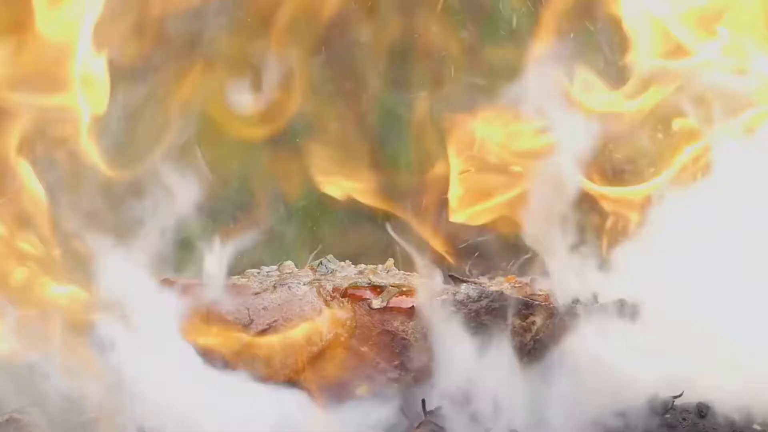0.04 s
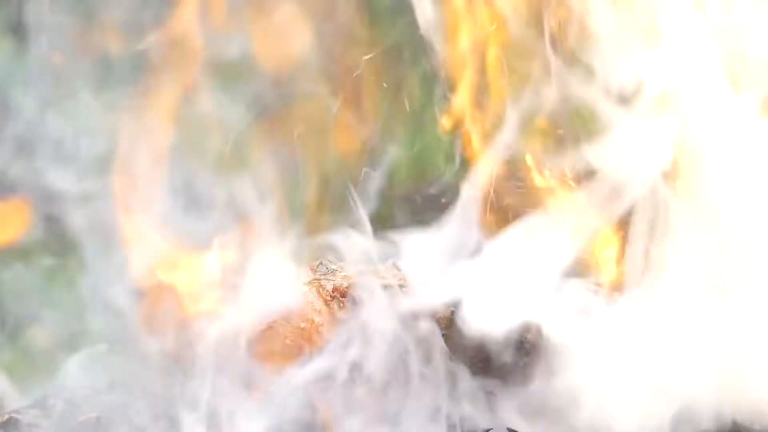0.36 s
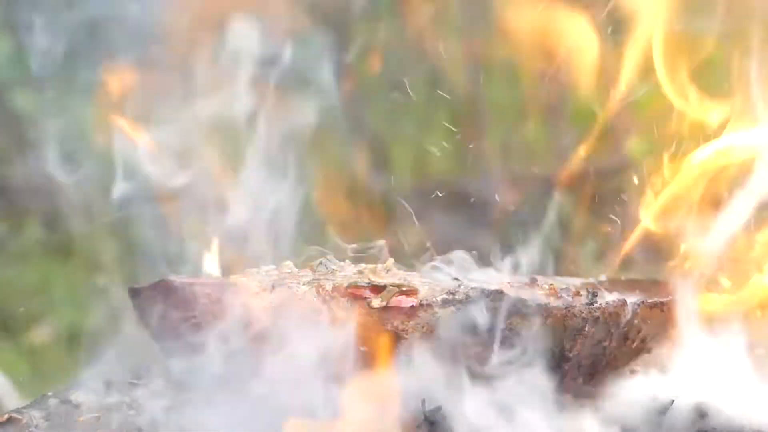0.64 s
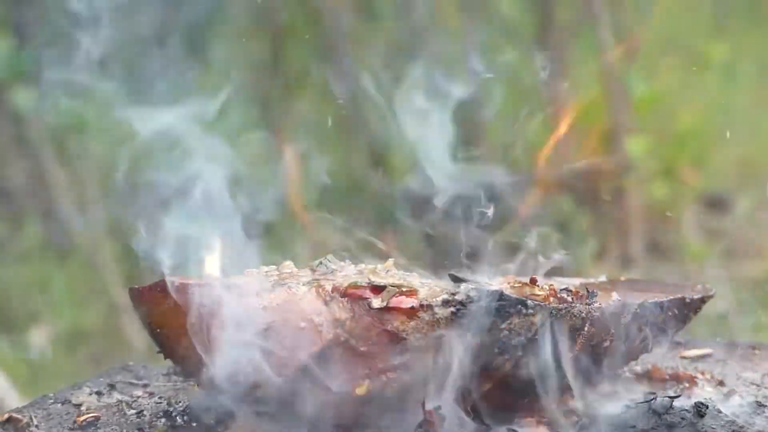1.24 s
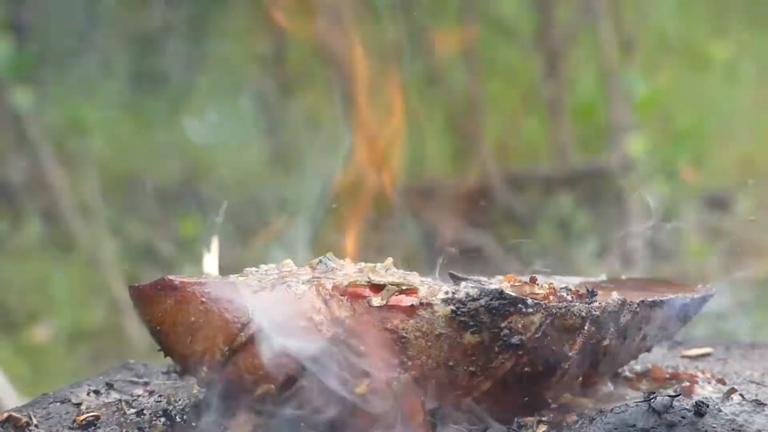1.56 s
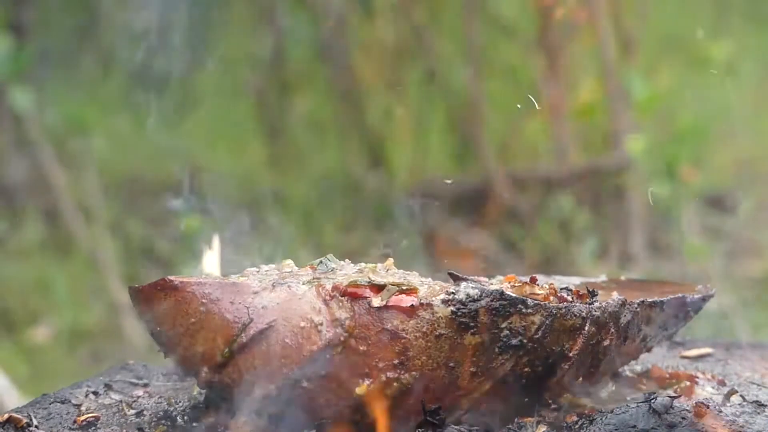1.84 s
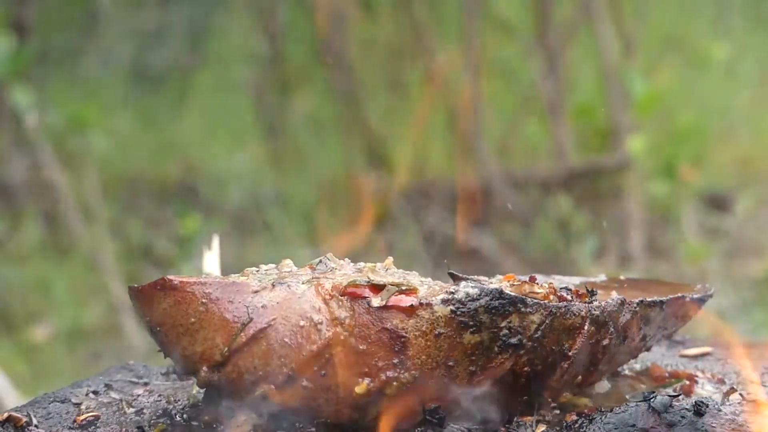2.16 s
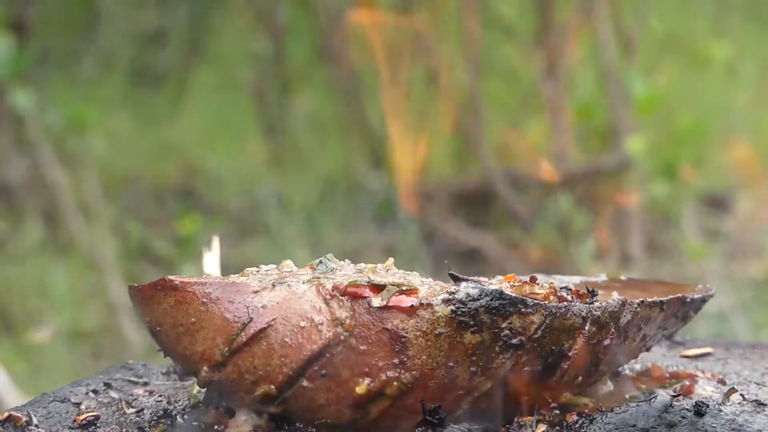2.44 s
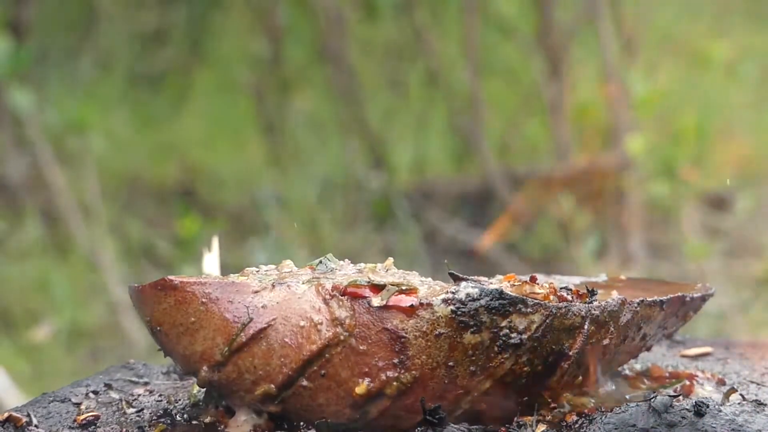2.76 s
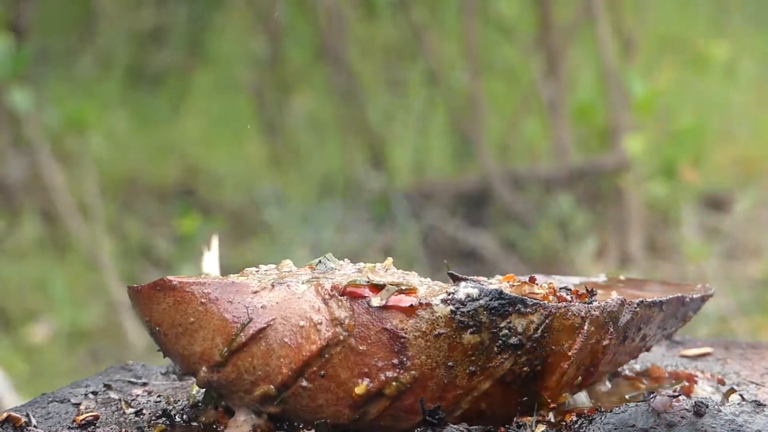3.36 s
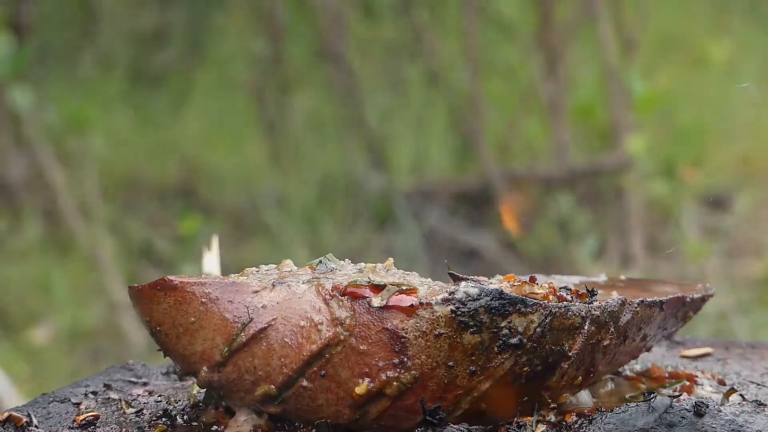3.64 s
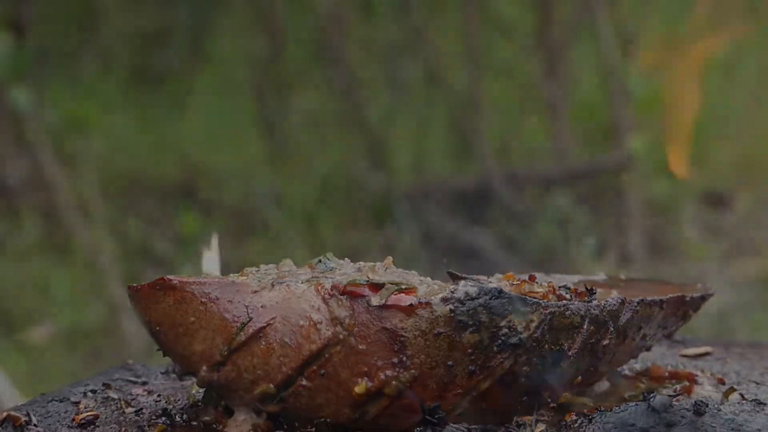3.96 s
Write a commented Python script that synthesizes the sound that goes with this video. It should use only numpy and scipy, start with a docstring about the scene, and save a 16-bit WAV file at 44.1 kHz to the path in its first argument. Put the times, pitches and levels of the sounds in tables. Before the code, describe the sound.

Close sizzling of food on a hot stone in the open air starts as a strong, bright hiss. Sharp pops join as it dies down to a lighter crackle, over a soft low flutter of flames.

```python
"""Food sizzling on a hot rock over an open fire, outdoors, close by.
0-0.8 s: the flames flare; countless tiny bursts of fat and water merge into a hiss.
From 0.7 s: single sharp pops, each a crack plus the ring of a bubble's cavity.
0.8-4 s: the flames die down; the hiss fades and thins into clumps of crackle.
Throughout: rock and ground reflect each burst within milliseconds; the fire rumbles softly below."""
import sys
import numpy as np
from scipy import signal
from scipy.fft import rfft, irfft, next_fast_len
from scipy.io import wavfile
from scipy.ndimage import map_coordinates

SR = 44100
rng = np.random.default_rng(int(sys.argv[2]) if len(sys.argv) > 2 else 0)


def pcm_store(signal):
    """Save signal as 16-bit PCM."""
    levels = np.round(np.clip(np.atleast_2d(signal), -1, 1) * 32767)
    wavfile.write(sys.argv[1], SR, levels.astype(np.int16).T)


N = 176400

# Sizzle envelope per band: t/s, low level/dB, mid level/dB, treble level/dB
SIZZLE_LEVELS = [(0, -33.5, -28, -27.5), (0.16, -35.5, -29.5, -27.5), (0.21, -37.5, -31, -29.5),
                 (0.33, -36, -29.5, -28), (0.72, -36, -30, -28.5), (0.81, -40, -33, -31.5),
                 (1.1, -41, -34.1, -32.0), (1.2, -40, -36.0, -34.5), (1.3, -42.5, -34.5, -32.5),
                 (1.6, -45, -34.5, -33.5), (1.68, -46, -37.0, -35.5), (2.0, -49, -38, -35.5),
                 (2.22, -51, -42, -39), (2.4, -50.5, -44.2, -42), (2.47, -50, -42.5, -43),
                 (2.56, -48, -39.5, -39.5), (2.72, -50.5, -41, -41.5), (2.93, -51.5, -41, -41.5),
                 (3.09, -50.5, -43.5, -41.5), (3.22, -49.5, -40.9, -39.5), (3.4, -50.5, -40.6, -39),
                 (3.5, -49.5, -45, -41.5), (3.64, -50, -40.5, -41.5), (3.75, -56.5, -44, -43),
                 (3.92, -53, -45, -46), (4, -50.5, -45.5, -42)]
# Sizzle colour: f/Hz, gain/dB
SIZZLE_EQ = [(100, -19), (190, -3.5), (228, -16.5), (270, -5), (346, -8), (426, -2), (534, -7.5),
             (648, -0.5), (762, -1.5), (852, -8.5), (1030, 0.5), (1180, -8.5), (1400, -5.5), (1600, -6),
             (2070, -4), (2510, -6), (3580, -4), (4580, -6), (6000, 0.5), (7400, 0), (8530, 1.5),
             (9400, -4.5)]
# Large bursts, ahead of POP_DB and POP_EQ: t/s, crack energy/dB, ring f/Hz, ring energy/dB
POP_EVENTS = [(0.7409, 2, 3740, -7), (0.7547, -1, 7550, 2), (0.8587, 3.5, 6400, -10),
              (0.9505, -5, 8200, -6), (1.0644, -3.5, 4600, -2), (1.1396, 3.5, 3800, 3.5),
              (1.1425, -18, 810, -6), (1.1449, 3.5, 2970, 2.5), (1.2936, -9, 6000, -9),
              (1.4958, -3, 4060, -13), (1.5327, -10, 7850, -5), (1.5714, -3, 3200, -11.5),
              (1.5859, 0, 1890, -6), (1.589, -16, 770, -4.5), (1.59, -11, 370, -4),
              (1.7092, -7.5, 2730, -14), (1.7311, -0.5, 3120, -10), (1.8058, -11, 8200, -8),
              (1.8114, -8, 7500, -12), (1.9034, -13.5, 6770, -1.5), (2.0146, -9, 7260, -8),
              (2.0242, -4.5, 2730, -15), (2.1192, -6, 7900, -12), (2.2936, 0, 2060, -8),
              (2.2964, -3.5, 2650, -15), (2.31, -12, 8030, -4.5), (2.4244, -3, 6960, -17),
              (2.604, -27, 480, -20), (2.6617, -26, 3500, -1.5), (2.6679, -9.5, 2730, -12),
              (2.7935, -11.5, 3630, -12), (2.9283, -7, 7500, -2.5), (2.9626, -17, 3100, -11.5),
              (3.0084, -23, 6900, -16), (3.029, -9.5, 3200, -17), (3.0355, -13, 7590, -11),
              (3.0587, -13, 7740, -7), (3.0654, -7, 8500, -13), (3.1347, -7.5, 2760, -15),
              (3.2099, -6, 2680, -7.5), (3.2852, -23, 2090, -9.5), (3.3291, -8.5, 2860, -9.5),
              (3.3305, -11, 6440, -11), (3.37, -8, 7000, -11), (3.3717, -14, 8300, 1.5),
              (3.4239, -18.5, 2180, -9.5), (3.4908, -11, 2500, -20), (3.5272, -23, 7170, -10),
              (3.5396, -15, 8100, -15), (3.5493, -12, 7000, -11), (3.61, -14, 1500, -12.5),
              (3.6311, -7, 2660, -7.5), (3.657, -31, 3000, -14), (3.692, -2.5, 8130, 3),
              (3.6921, -12, 820, -8), (3.7552, -17, 6100, -16), (3.7768, -29, 8300, -14),
              (3.7839, -6.5, 7660, -9), (3.867, -5, 8200, -2.5)]
# Pop colour: f/Hz, gain/dB
POP_EQ = [(120, -30), (300, -7.5), (700, -5), (1100, -2), (2000, -.5), (3600, -.5), (4600, -4), (6000, -1),
          (8000, 1.5), (9500, -4.5)]
# Fire rumble envelope: t/s, level/dB
RUMBLE_LEVELS = [(0, -42), (.26, -47.5), (.51, -41.5), (.8, -46.5), (1.27, -49.5), (2.1, -48.5), (2.7, -49),
                 (3.1, -45), (3.23, -43), (3.5, -45), (4, -47.5)]
# Fire rumble colour: f/Hz, gain/dB
RUMBLE_EQ = [(15, -42), (25, -19), (40, -8.5), (55, -2), (80, -1), (120, -1), (175, -4), (228, -15),
             (280, -10), (400, -17.5), (900, -42.5), (2000, -70.5)]
# Stereo width: f/Hz, side gain/dB
SIDE_EQ = [(100, 1.5), (300, 1.5), (700, 0), (2000, -0.5), (4000, -1.5), (8000, 2.1)]
# Stereo balance: f/Hz, left over right/dB
BALANCE = [(100, -0.5), (300, 0.5), (700, -1.7), (1500, -1.6), (3000, -1.1), (5500, -0.5), (8500, 1.5)]

LOW_SPLIT_HZ, HIGH_SPLIT_HZ, TOP_HZ = 1300, 4670, 9680
FLARE_BURSTS_PER_S, EMBER_BURSTS_PER_S = 9000, 650
CLUMP_FLARE_DB, CLUMP_EMBER_DB, CLUMP_PER_S, CLUMP_LIMIT_SIGMA = 1, 3, 110, 0.95
FLICKER_DB, FLICKER_PER_S = 0.5, 70
SIZE_SPREAD_DB, SIZE_LIMIT_SIGMA, PAN_SPREAD = 8, 1.86, 0.23
CAVITY_HZ, CAVITY_LOG_SPREAD, RING_OVER_CRACK_DB = 3720, 0.65, -5
CRACK_DECAY_S, RING_DECAY_CYCLES = 0.00012, 0.69
CRACK_FLATNESS = 0.64  # spectrum: 0 ragged, 1 flat
STEAM_DB, POP_DB = -4, -1
NEAR_DELAY_S, NEAR_T60_S, NEAR_DB = 0.0017, 0.02, -6
TREES_T60_S, TREES_DB = 0.09, -13.5
FLUTTER_DB, FLUTTER_PER_S = 1.5, 18


def sizzle():
    """Clumped crackle over steam hiss, in three bands that fade as the flames die."""
    levels_db = curves(SIZZLE_LEVELS)
    treble_db = levels_db[-1]
    heat = (treble_db - treble_db.min()) / np.ptp(treble_db)  # 0 embers, 1 flare
    depth_db = CLUMP_EMBER_DB + (CLUMP_FLARE_DB - CLUMP_EMBER_DB) * heat
    clump_db = depth_db * CLUMP_LIMIT_SIGMA * np.tanh(wobble(CLUMP_PER_S) / CLUMP_LIMIT_SIGMA)
    flickers_db = [FLICKER_DB * wobble(FLICKER_PER_S) for _ in levels_db]
    steam = unit_rms(filtered(stereo_noise(correlation=0.54), lambda hz: lowpass(hz, TOP_HZ, order=8)))
    fry = (crackle(heat) + amp(STEAM_DB) * steam) * amp(clump_db)
    low = lambda hz: lowpass(hz, LOW_SPLIT_HZ, order=8) ** 2
    mid = lambda hz: lowpass(hz, HIGH_SPLIT_HZ, order=8) ** 2 - low(hz)
    treble = lambda hz: (1 - low(hz) - mid(hz)) * (hz < TOP_HZ)
    out = np.zeros((2, N))
    for band, level_db, flicker_db in zip([low, mid, treble], levels_db, flickers_db):
        part = filtered(fry, lambda hz: band(hz) * amp(eq_db(SIZZLE_EQ, hz)))
        out += amp(level_db) * unit_rms(amp(flicker_db) * part)
    return out


def crackle(heat, spots=12, samples=64):
    """Tiny bursts of fat and water at scattered spots: denser when hotter, mean power constant."""
    rate_per_s = EMBER_BURSTS_PER_S * (FLARE_BURSTS_PER_S / EMBER_BURSTS_PER_S) ** heat
    out = np.zeros((2, N))
    for pan in PAN_SPREAD * unit_rms(np.linspace(-1, 1, spots)):
        starts = np.flatnonzero(rng.random(N) < rate_per_s / SR / spots)
        size, pitch, ring = rng.standard_normal((len(starts), 3)).T
        gain = amp(SIZE_SPREAD_DB * np.minimum(size, SIZE_LIMIT_SIGMA)) / np.sqrt(rate_per_s[starts])
        ring_hz = np.clip(CAVITY_HZ * np.exp(CAVITY_LOG_SPREAD * pitch), 500, TOP_HZ)
        grains = gain[:, None] * bursts(0, ring_hz, RING_OVER_CRACK_DB + 2 * ring, samples)
        indices = starts[:, None] + np.arange(samples)
        spot = np.bincount(indices.ravel(), grains.ravel(), N)[:N]  # overlap-add
        out += reflections(np.outer([1 + pan, 1 - pan], spot))
    return unit_rms(out)


def pops():
    """Single large bursts, centred, each with its own reflections."""
    times_s, crack_db, ring_hz, ring_db = np.transpose(POP_EVENTS)
    out = np.zeros((2, N))
    for time_s, pop in zip(times_s, bursts(crack_db, ring_hz, ring_db, samples=384)):
        start = round(time_s * SR)
        sound = reflections(np.array([pop, pop]))[:, :N - start]
        out[:, start:start + sound.shape[1]] += sound
    return filtered(out, lambda hz: amp(POP_DB + eq_db(POP_EQ, hz)))


def bursts(crack_db, ring_hz, ring_db, samples):
    """One row per bursting bubble: a 0.5 ms crack plus a few cycles of cavity ring."""
    t = np.arange(samples) / SR
    tear = rfft(rng.standard_normal((len(ring_hz), samples)) * t * np.exp(-t / CRACK_DECAY_S))
    flattened = tear / (np.abs(tear) + 1e-12) ** CRACK_FLATNESS
    crack = irfft(flattened, samples) * np.exp(-2 * t / t[-1])
    crack = signal.sosfilt(signal.butter(4, TOP_HZ, fs=SR, output="sos"), crack)
    cycles = ring_hz[:, None] * t
    phase = rng.random((len(ring_hz), 1))
    ring = cycles * np.exp(-cycles / RING_DECAY_CYCLES) * np.sin(2 * np.pi * (cycles + phase))
    return amp(crack_db)[..., None] * unit_energy(crack) + amp(ring_db)[..., None] * unit_energy(ring)


def reflections(x):
    """Direct sound, quick scatter off rock and ground, faint tail from trees; new paths per call."""
    t = np.arange(SR // 8) / SR
    shared, left, right, *far = rng.standard_normal((5, len(t)))
    late = t > NEAR_DELAY_S
    near = unit_energy((shared + 0.55 * np.array([left, right])) * late * amp(-60 * t / NEAR_T60_S))
    trees = unit_energy(np.array(far) * late * amp(-60 * t / TREES_T60_S))
    response = (t == 0) + amp(NEAR_DB) * near + amp(TREES_DB) * trees
    return signal.fftconvolve(x, response, axes=1)[:, :N]


def flames():
    """Low, fluttering rumble of the fire."""
    level_db, = curves(RUMBLE_LEVELS)
    rumble = filtered(stereo_noise(correlation=0.7), lambda hz: amp(eq_db(RUMBLE_EQ, hz)))
    flutter = amp(FLUTTER_DB * wobble(FLUTTER_PER_S))
    return amp(level_db) * unit_rms(rumble * flutter)


def amp(db):
    """dB to amplitude."""
    return 10 ** (np.asarray(db) / 20)


def unit_rms(x):
    """Scale to rms 1."""
    return x / np.sqrt(np.mean(x ** 2) + 1e-20)


def unit_energy(x):
    """Scale each row to energy 1."""
    return x / np.sqrt(np.sum(x ** 2, -1, keepdims=True) + 1e-20)


def eq_db(table, hz):
    """Interpolate (f/Hz, gain/dB) rows over log frequency."""
    knots_hz, gains_db = np.transpose(table)
    return np.interp(np.log(hz + 1), np.log(knots_hz + 1), gains_db)


def curves(table):
    """One per-sample curve for each column after t/s."""
    times_s, *columns = np.transpose(table)
    return [np.interp(np.arange(N) / SR, times_s, column) for column in columns]


def wobble(knots_per_s):
    """Smooth random curve."""
    return map_coordinates(rng.standard_normal(N // 100), [np.arange(N) * knots_per_s / SR], mode="wrap")


def filtered(x, response):
    """Zero-phase filter with gain response(hz)."""
    size = next_fast_len(N + SR // 2)
    return irfft(rfft(x, size) * response(np.fft.rfftfreq(size, 1 / SR)), size)[..., :N]


def lowpass(hz, edge_hz, order):
    """Butterworth magnitude."""
    return 1 / np.sqrt(1 + (hz / edge_hz) ** (2 * order))


def stereo_noise(correlation):
    """White noise with the given left-right correlation."""
    mid, side = rng.standard_normal((2, N))
    angle = np.arccos(correlation) / 2
    return np.cos(angle) * mid + np.sin(angle) * np.array([side, -side])


def scene():
    """Fire, pops and sizzle; the top treble is wider and leans left, the mids lean right."""
    left, right = flames() + pops() + sizzle()
    mid = (left + right) / 2
    side = filtered((left - right) / 2, lambda hz: amp(eq_db(SIDE_EQ, hz)))
    stereo = np.array([mid + side, mid - side])
    return filtered(stereo, lambda hz: amp(np.outer([0.5, -0.5], eq_db(BALANCE, hz))))


def record(dry):
    """Steep band limit at TOP_HZ."""
    return filtered(dry, lambda hz: lowpass(hz, TOP_HZ, order=90))


dry = scene()
out = record(dry)
pcm_store(out)
```